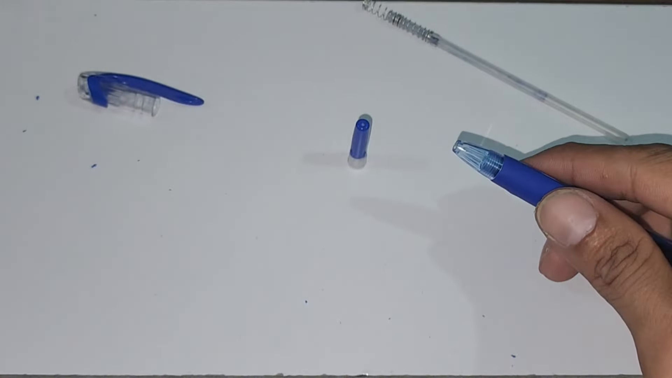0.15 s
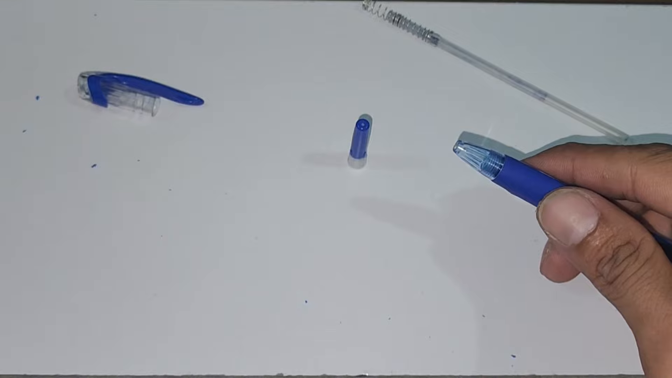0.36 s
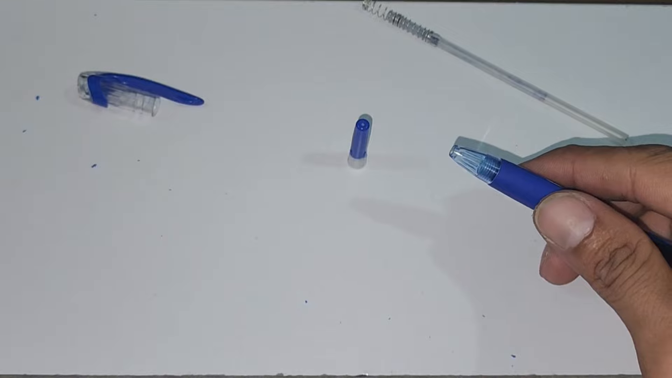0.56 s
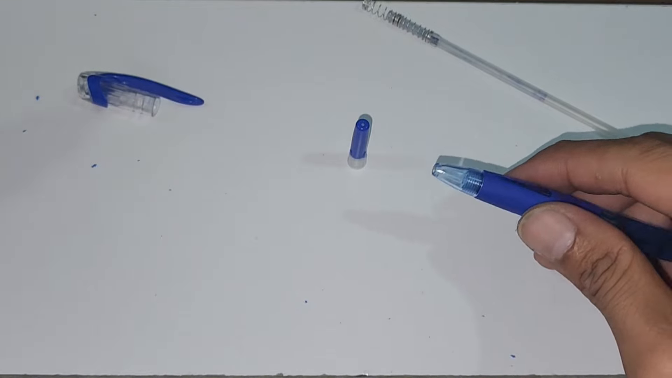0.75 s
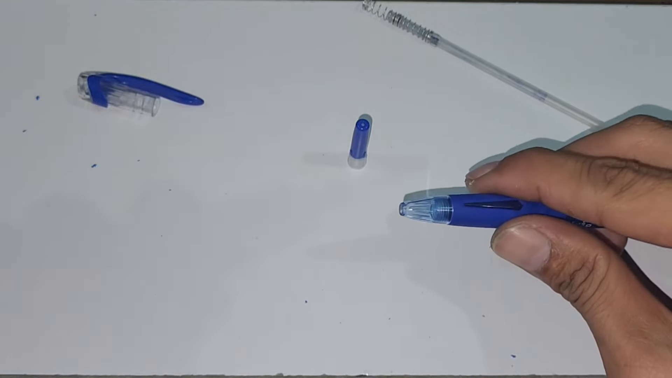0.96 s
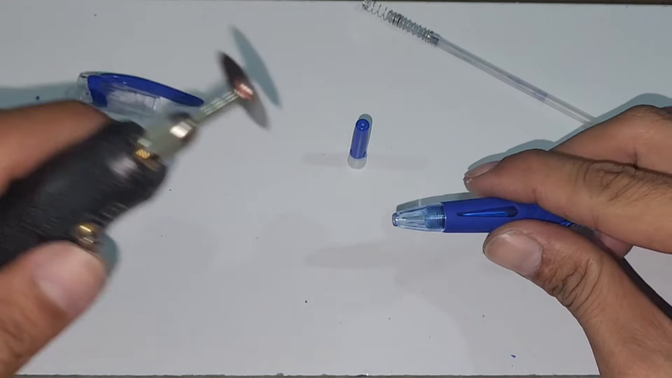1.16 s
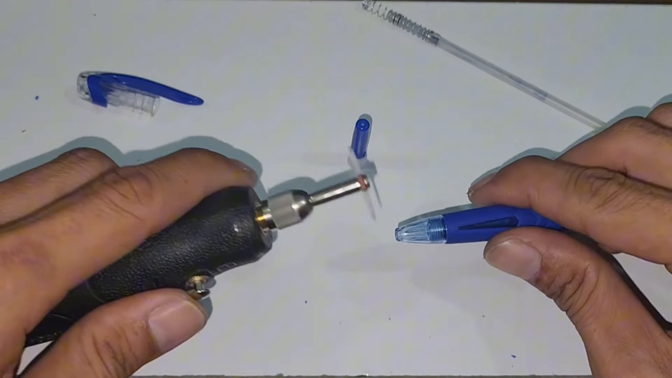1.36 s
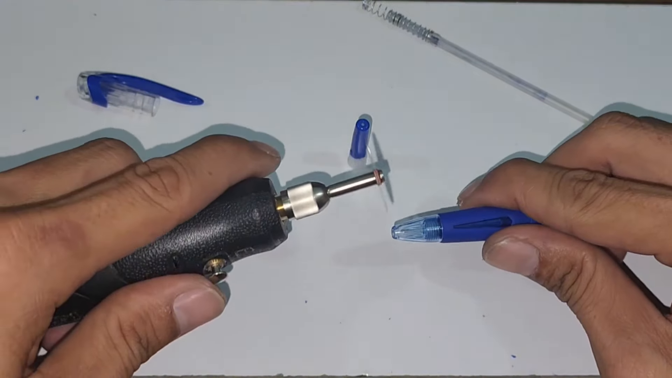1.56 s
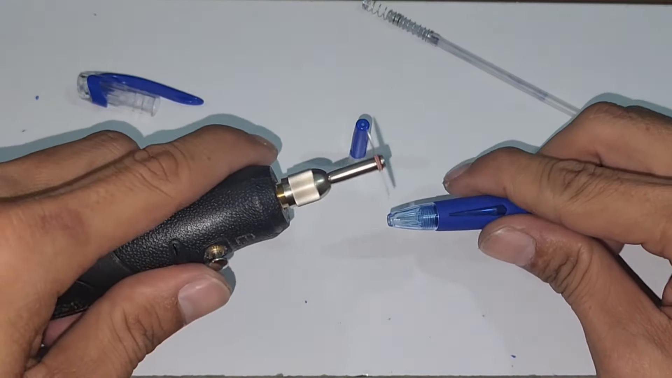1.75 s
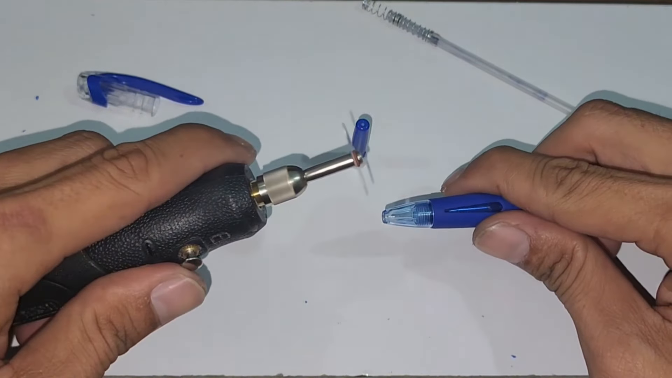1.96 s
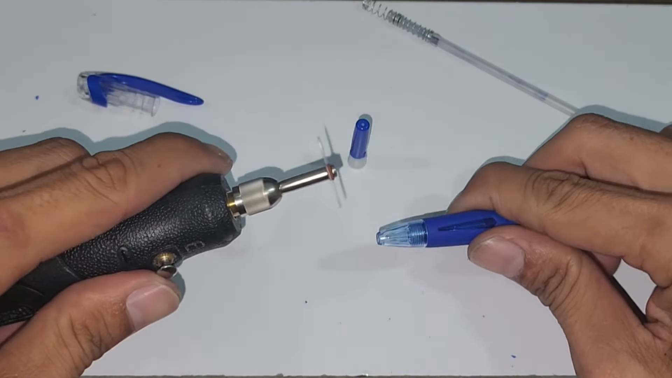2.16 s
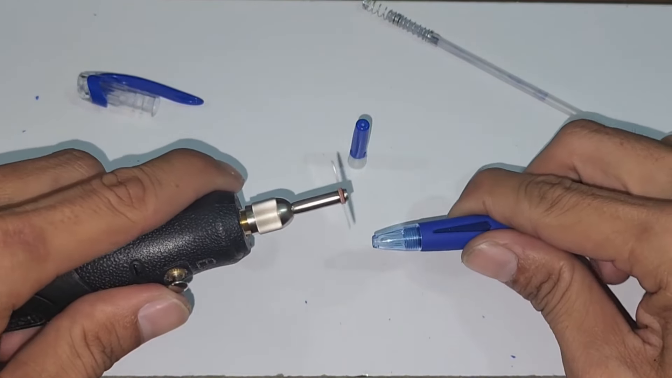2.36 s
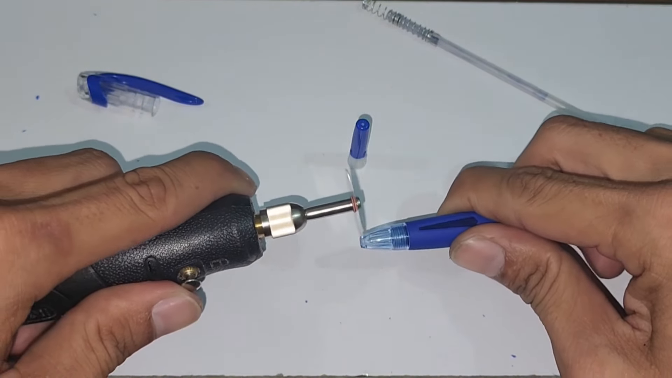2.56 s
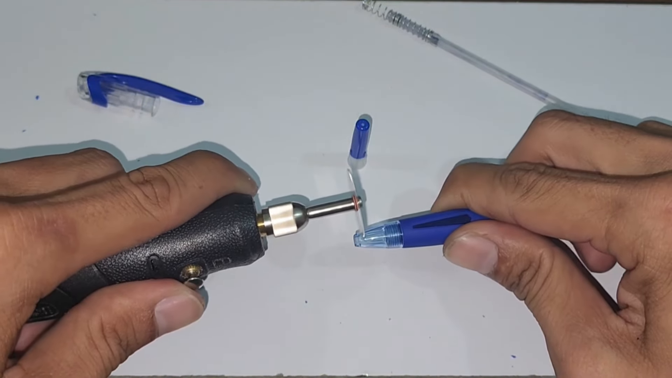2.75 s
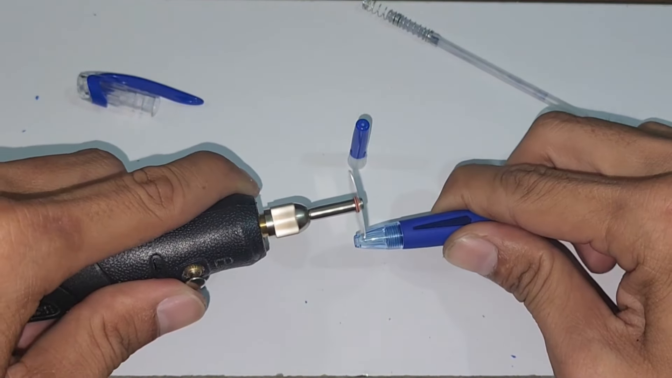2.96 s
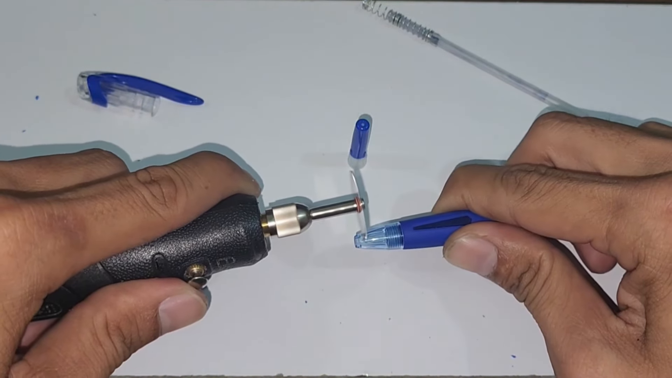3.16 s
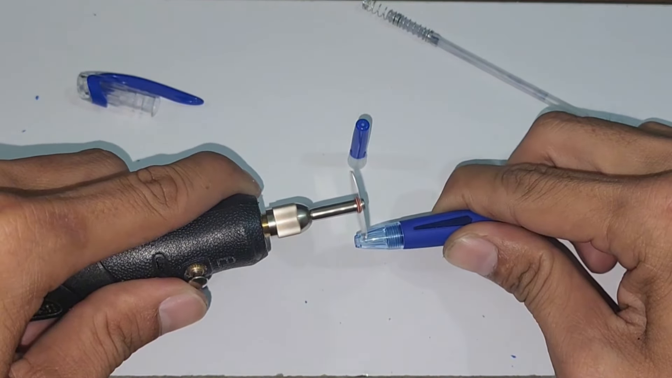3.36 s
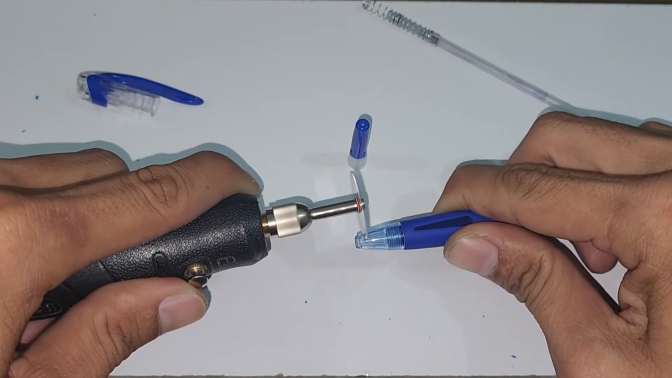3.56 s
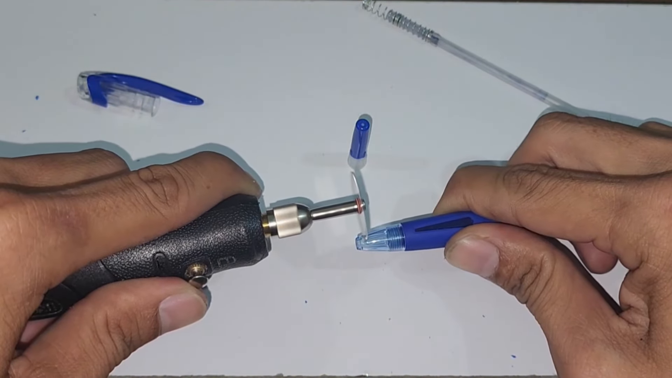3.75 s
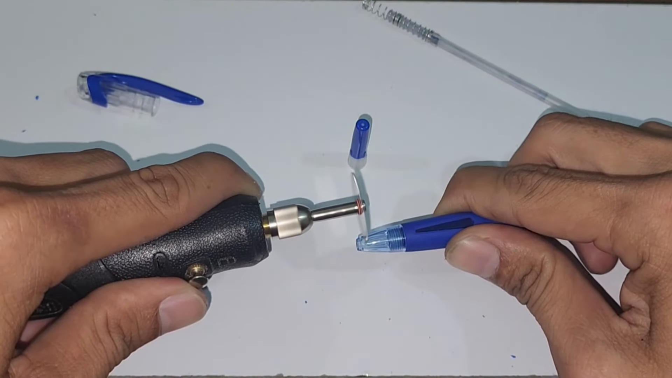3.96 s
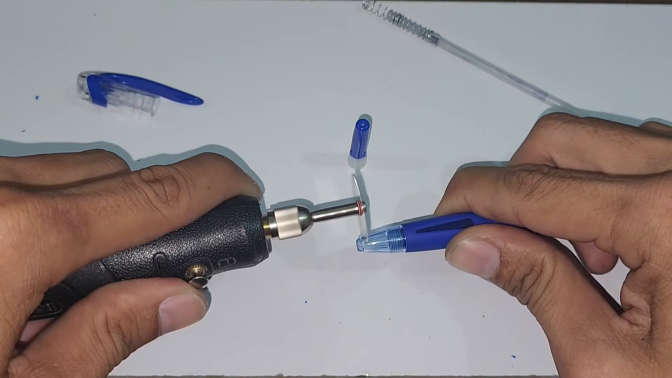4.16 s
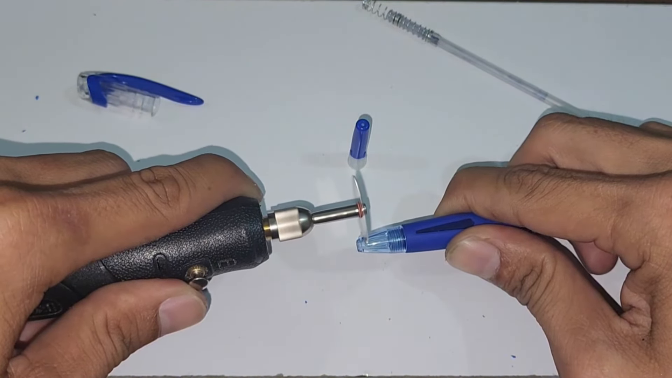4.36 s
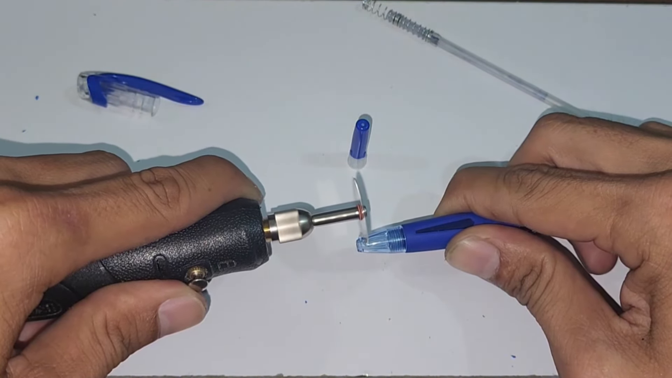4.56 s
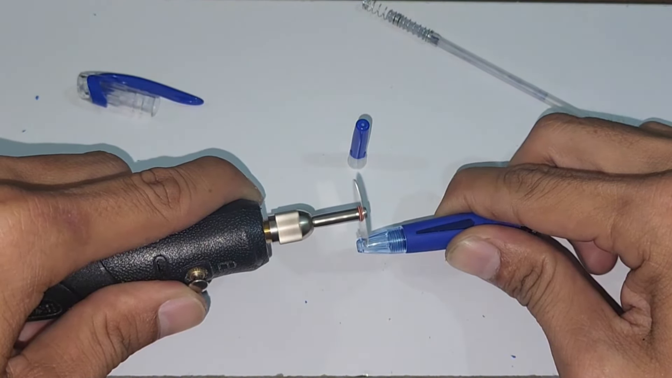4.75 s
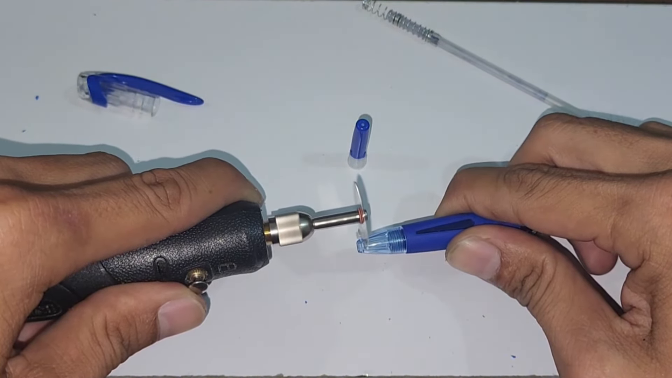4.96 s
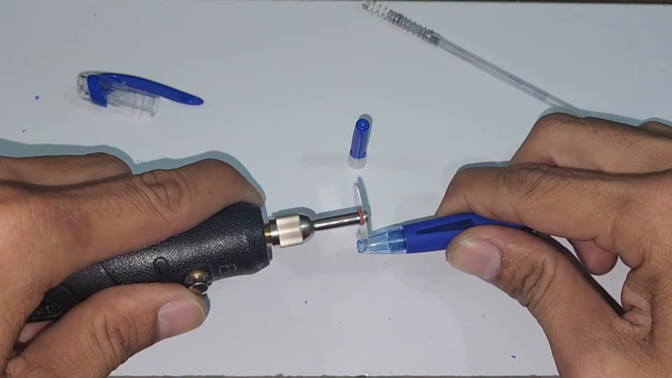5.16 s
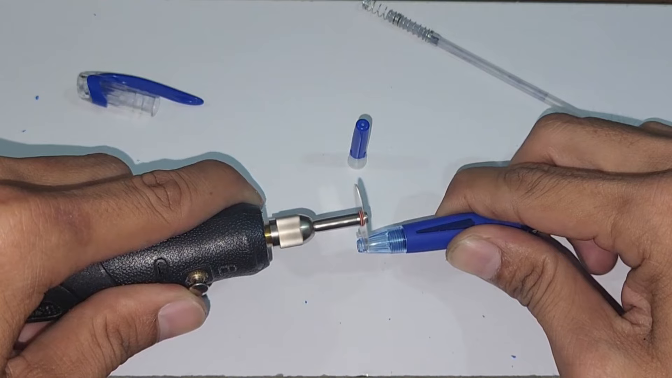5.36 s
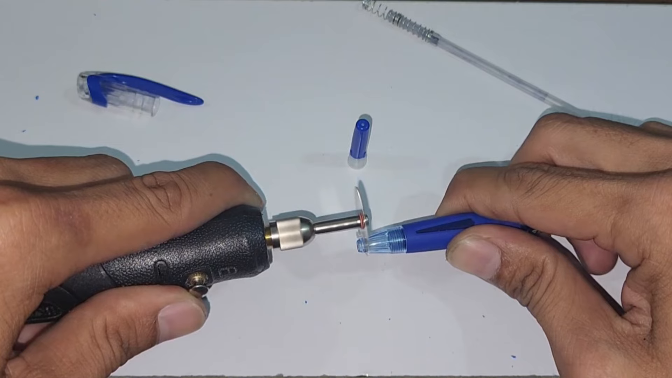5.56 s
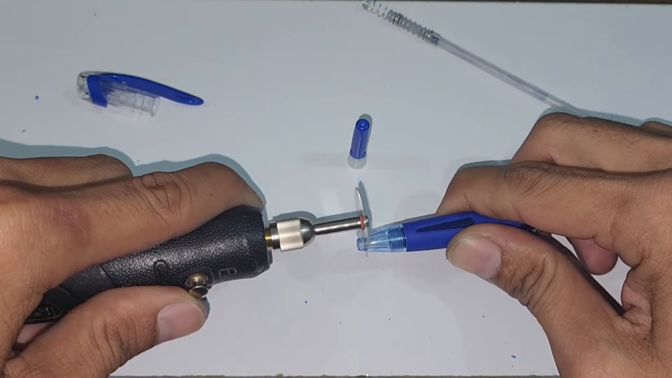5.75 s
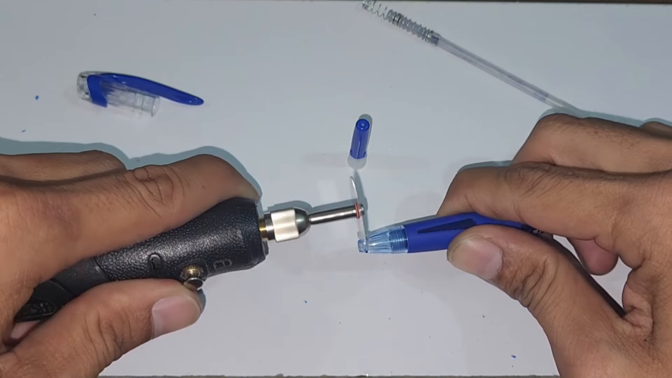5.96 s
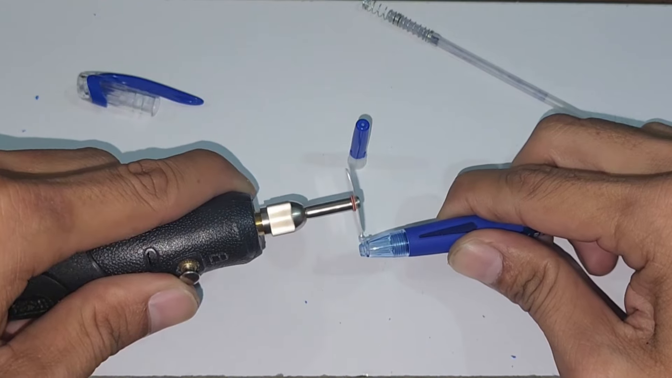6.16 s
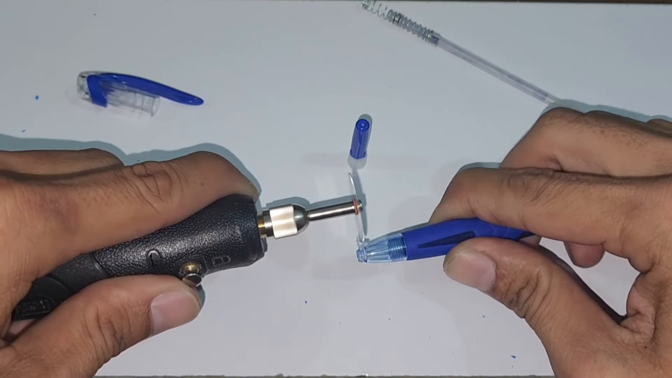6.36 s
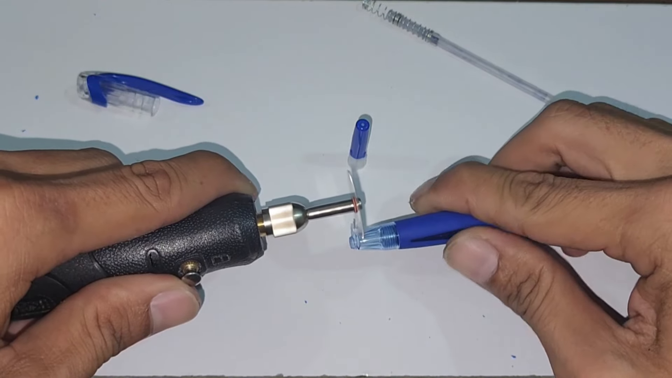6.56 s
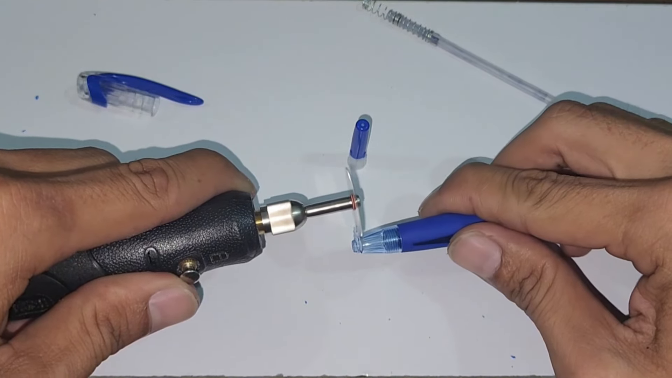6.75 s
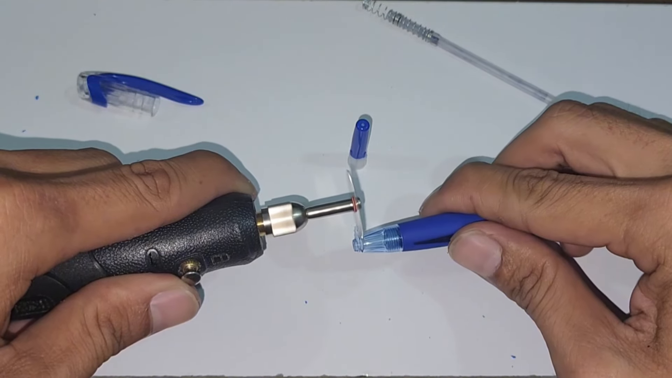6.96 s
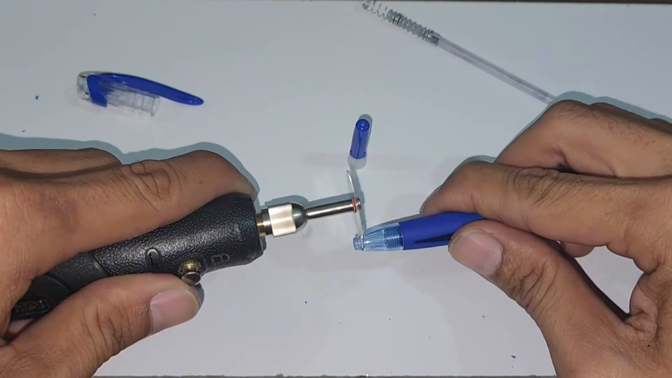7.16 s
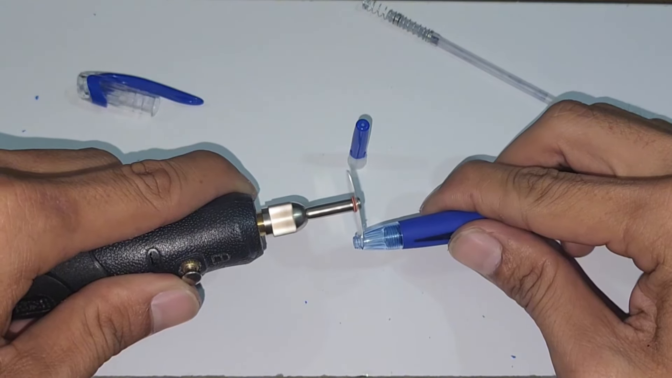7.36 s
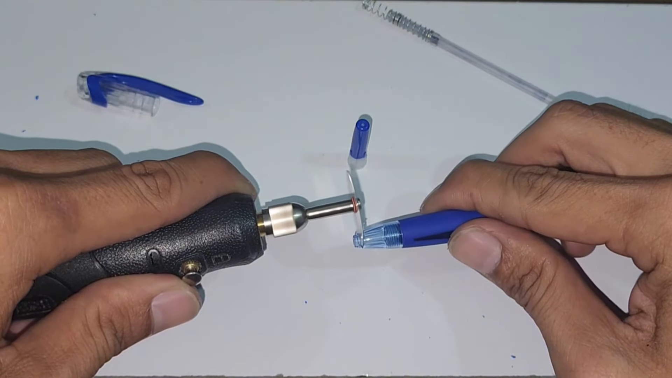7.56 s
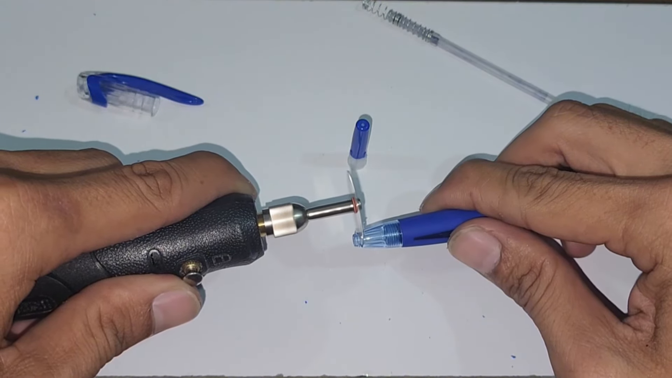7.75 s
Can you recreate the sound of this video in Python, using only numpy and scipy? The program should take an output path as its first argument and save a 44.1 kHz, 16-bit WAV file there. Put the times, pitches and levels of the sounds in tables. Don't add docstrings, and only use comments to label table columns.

```python
import sys
import numpy as np
from scipy import signal
from scipy.fft import rfft, irfft, next_fast_len
from scipy.io import wavfile
from scipy.ndimage import uniform_filter1d, map_coordinates

SR = 44100
rng = np.random.default_rng(int(sys.argv[2]) if len(sys.argv) > 2 else 0)


def log_audio(samples):
    frames = np.atleast_2d(samples).T
    limited = np.clip(frames, -1, 1)
    pcm = np.round(limited * 32767).astype(np.int16)
    wavfile.write(sys.argv[1], SR, pcm)


def gain_from_db(level_db):
    decades = np.asarray(level_db, float) / 20
    return 10 ** decades


N = 344421
T = np.arange(N) / SR
ARRIVE_S = 1.76
ORDERS = np.arange(1, 112)


def evened(x):
    return x / np.sqrt(np.mean(abs(x) ** 2) + 1e-20)


def along(rows, col, t, off=None):
    rows = np.array(rows)
    return np.interp(t, rows[:, 0], rows[:, col], off, off)


def read(points, hz):
    f, value = np.transpose(points)
    return np.interp(np.log(hz + 1), np.log(f + 1), value)


def coloured(x, points):
    size = next_fast_len(N)
    gain = gain_from_db(read(points, np.fft.rfftfreq(size, 1 / SR)))
    return irfft(rfft(x, size) * gain, size)[..., :N]


def resonance(x, hz, width):
    return signal.lfilter(*signal.iirpeak(hz, hz / width, SR), x)


def smooth(span):
    return evened(signal.oaconvolve(rng.standard_normal(N), np.hanning(int(span)), "same"))


def drift(shape, turns):
    z = rng.standard_normal(shape) + 1j * rng.standard_normal(shape)
    speed = np.fft.fftfreq(shape[0])[:, None]
    return evened(np.fft.ifft(z * np.exp(-(speed * turns) ** 2), axis=0))


# (frequency [Hz], level [dB per Hz])
ROOM = [(12, -33), (20, -11), (130, -5.5), (172, -20), (255, -12), (337, -17), (399, -28.5), (499, -24),
        (624, -29.5), (759, -28.5), (873, -31.5), (1570, -31.5), (1710, -30.5), (2080, -42), (16000, -62)]
# (frequency [Hz], width [Hz], level [dB])
HUM = [(88.7, 6.3, -62.5), (129.1, 7.3, -61.5), (164.3, 34, -68.5), (198.7, 15.5, -65)]
# (frequency [Hz], shared part [0-1])
SAME = [(30, 0.88), (120, 1), (300, 0.16), (700, 0.44), (1500, 0.085), (16000, 0.21)]


def room():
    size = next_fast_len(N)
    same = read(SAME, np.fft.rfftfreq(size, 1 / SR))
    shared = rfft(rng.standard_normal(size))
    private = rfft(rng.standard_normal(size))
    z = np.array([shared, same * shared + np.sqrt(1 - same ** 2) * private])
    white = evened(irfft(z, size)[:, :N])
    hum = sum(gain_from_db(db) * evened(resonance(resonance(white, f, w), f, w)) for f, w, db in HUM)
    return gain_from_db(-56.5) * evened(coloured(white, ROOM)) + hum


# (time [s], peak level [dB], ring [Hz])
TICKS = [
    (0.053, -65.5, 4720),
    (0.38, -59, 4120),
    (0.466, -40, 6430),
]
# (time [s], level [dB])
START = [(.43, -84), (.45, -39.5), (.47, -41), (.49, -46), (.56, -42), (.62, -42), (.72, -50)]


def switch():
    out, t = np.zeros((2, N)), np.arange(2600) / SR
    decay = gain_from_db(-60 * t / 0.012) + 0.33 * gain_from_db(-60 * t / 0.064)
    for s, db, hz in TICKS:
        burst = rng.standard_normal((2, len(t))) * decay
        click = 0.19 * np.diff(burst, prepend=0)
        ring = 5.1 * resonance(burst, hz, 1630)
        at = int(s * SR)
        out[:, at:at + len(t)] += gain_from_db(db + 2.0) * (click + ring)
    spectrum = [(900, -17), (2500, 5), (9000, -3), (14000, 7), (16000, 4.0)]
    hiss = evened(coloured(rng.standard_normal((2, N)), spectrum))
    return out + hiss * uniform_filter1d(gain_from_db(along(START, 1, T, -99)), 300)


# (time [s], speed [turns per s])
SPEED = [(0.6, 302), (3.75, 305), (3.989, 298.5), (4.262, 277), (4.509, 257), (4.709, 270.5), (4.82, 267),
         (5.101, 270), (5.551, 252), (5.698, 224.3), (6.099, 301.5), (6.54, 306.3), (6.583, 296),
         (6.669, 289), (6.788, 306), (7.3, 305), (7.691, 281.5), (7.81, 277)]
# (time [s], speed [turns per s])
STALL = [
    (5.779, 195),
    (5.831, 160),
    (5.869, 128),
    (5.922, 117),
    (5.951, 128),
    (5.98, 180),
    (5.998, 190),
    (6.029, 255),
    (6.06, 284),
]


def shaft():
    outside = [r for r in SPEED if not STALL[0][0] <= r[0] <= STALL[-1][0]]
    speed = uniform_filter1d(along(sorted(outside + STALL), 1, T), 700)
    kick_s, spin_up_s = .316, .163
    speed = speed * (1 - np.exp(-((np.maximum(T, .45) - kick_s) / spin_up_s) ** 2))
    tremble = smooth(1170) * (0.21 + 0.0263 * (306 - speed).clip(0, 60))
    turns = np.cumsum(speed + tremble) / SR
    whole = np.arange(int(turns[-1]) + 2)
    times = np.interp(whole, np.append(turns, turns[-1] + speed[-1]), np.append(T, T[-1] + 1))
    return turns, times


def played(orders, turns, times):
    steps = 1024
    hz = np.arange(1, orders.shape[1] + 1) / np.gradient(times)[:, None]
    audible = np.pad(orders * (hz < 17500), ((0, 0), (1, 0)))
    shapes = irfft(audible, steps, axis=1) * steps / np.sqrt(2)
    shapes = np.hstack([shapes, shapes[:, :1]])
    return map_coordinates(shapes, [turns, turns % 1 * steps], order=1, mode="nearest")


def whine_level(speed, times):
    on_s = .45
    wake = np.where(times > on_s, -20.5 * np.exp(-(times - on_s).clip(0) / 0.15), -70)
    change = np.gradient(uniform_filter1d(speed, size=15), times)
    brake = -4 * np.tanh((-change).clip(0) / 80)
    surge = -11 * np.tanh(change.clip(0) / 320)
    crawl = (215 - speed).clip(0) * (times > ARRIVE_S)
    far = 2 * (1 - times / ARRIVE_S).clip(0)
    return wake + far + brake + surge + .06 * crawl, wake, crawl


# (time [s], level of the once-a-turn tone [dB])
HOLD = [(0.65, -51), (1.15, -54), (1.22, -62), (1.64, -52), (1.86, -41), (2.1, -48), (2.23, -42),
        (3.81, -41.5), (4.49, -53), (5.0, -53), (5.28, -62), (5.44, -47), (5.7, -53), (6.01, -59.5),
        (6.29, -58), (6.33, -45), (7.32, -41.5), (7.81, -52)]


def firmness(times):
    hold = along(HOLD, 1, times)
    return hold, hold + 40


# (multiple of the shaft [1], level [dB])
IDLE = [(1, 0), (2, -20), (3, -16), (4, -15), (5, -2), (6, -12), (7, -9), (8, -22), (9, -20), (10, -11),
        (11, -17), (12, -8), (13, -13), (14, -16), (15, -3), (16, -12), (17, -13), (18, -9)]
# (frequency [Hz], level [dB])
UPPER = [(5800, -22.5), (6700, -15), (7600, -20.5), (9600, -26.5), (10000, -14.5), (10900, -10.5),
         (11300, -20), (16000, -20)]
# (frequency [Hz], level [dB])
LOADED = [(280, -1), (480, -28), (660, -16.5), (897, -23), (1300, -8.5), (2420, -6.5), (2670, -14),
          (4760, -4), (5790, -18.5), (6540, -6.5), (9000, -10.5), (11700, -60), (19800, -120)]


def housing_buzz(speed, times, load):
    upper = read(UPPER, 304 * ORDERS[len(IDLE):])
    free = np.append(np.transpose(IDLE)[1], upper) + 0.11 * firmness(times)[1][:, None]
    loaded = read(LOADED, ORDERS * speed[:, None]) + .5
    level = whine_level(speed, times)[0][:, None]
    return gain_from_db((1 - load) * free + load * loaded - 41.5 + level)


ORDERS_HELD = (2, 4, 5, 7, 8, 12, 15)
# (running free [dB], under load [dB], share of the hold followed [1],
# gain while the tool is turned away [dB])
TONES = [(-62, -56, 0.13, 2), (-56, -57.5, .4, -1), (-44.5, -51, 0.37, -1), (-54, -45.5, 0.54, 12),
         (-64, -54.5, 0.077, 13), (-53, -51, 0.054, 5), (-44, -46, 0.017, 1.5)]


def held_tones(strength, speed, times, load, bitten, lurch):
    hold, firm = firmness(times)
    _, wake, crawl = whine_level(speed, times)
    load, bitten, lurch = load[:, 0], bitten[:, 0], lurch[:, 0]
    boom = sum(np.exp(-((speed - hz) / 20) ** 2) for hz in (130, 199)) * (times > ARRIVE_S)
    damping = 1 - 0.18 * bitten * (1 - load)
    strength[:, 0] = damping * gain_from_db(hold + wake + 12.5 * boom)
    away = np.clip((ARRIVE_S + 0.35 - times) / .5, 0, 1)
    for k, (free_db, load_db, share, away_db) in zip(ORDERS_HELD, TONES):
        free = free_db + share * firm + away_db * away
        db = (1 - load) * free + load * load_db + wake
        if min(ORDERS_HELD) < k < max(ORDERS_HELD):
            db = db - 9.4 * np.tanh(lurch)
        strength[:, k - 1] = gain_from_db(db - .3 * crawl * np.clip((k - 3) / 2, -.15, 1))


def swelling(times, steady, strain, shaky):
    shape = (len(times), len(ORDERS))
    start = np.exp(2j * np.pi * rng.random(len(ORDERS)))
    jump_share = 0.68
    slow = drift(shape, turns=85)
    jumps = drift(shape, turns=.01)[np.searchsorted(np.transpose(HOLD)[0], times)]
    slow = np.sqrt(1 - jump_share ** 2) * slow + jump_share * uniform_filter1d(jumps, size=7, axis=0)
    tone = 1 + np.where(ORDERS > 1, .35, .15) * slow
    swell = start * np.where(steady, tone, 0.56 + 0.96 * slow)
    broken = np.clip(0.35 + 0.48 * strain, 0, .95) * np.clip(ORDERS / 5, 0, 1)
    swell = np.sqrt(1 - broken ** 2) * swell + broken * drift(shape, turns=11)
    return np.sqrt(1 - shaky ** 2) * swell + shaky * drift(shape, turns=0.14)


# (frequency [Hz], width [Hz], gain [dB])
TUBE = [(1269, 64, 5.5), (2064, 51, 8.5), (4770, 67, 2)]
# (frequency [Hz], level [dB])
SIDE_DB = [(60, -13), (150, -2), (380, -16), (950, 0), (2380, 0.5), (5980, -0.5), (15000, 0.5)]


def motor(turns, times):
    speed = uniform_filter1d(1 / np.gradient(times), 5)
    load = np.clip((301 - speed) / 25, 0, 1)[:, None]
    bitten = np.clip(np.interp(times, T, contact()) / gain_from_db(-57.0), 0, 1)[:, None]
    strain = np.maximum(load, bitten)
    lurch = (np.gradient(speed, times)[:, None] / 900) ** 2
    settling = .045 + .04 * np.exp(-(times[:, None] - .6).clip(0) / .7)
    patches = drift((len(times), len(ORDERS)), turns=52).real
    patchy = abs(evened(uniform_filter1d(patches, 3, 1))) + 2.25
    rough = patchy * settling + lurch + ((245 - speed[:, None]) / 50).clip(0)
    shaky = np.clip(rough * (ORDERS / 15) ** .5, 0, .95)
    strength = housing_buzz(speed, times, load)
    held_tones(strength, speed, times, load, bitten, lurch)
    for hz, width, db in TUBE:
        near = np.exp(-((ORDERS * speed[:, None] - hz) / width) ** 2)
        strength = strength * gain_from_db(db * strain * near)
    steady = np.isin(ORDERS, (1, *ORDERS_HELD))
    middle = strength * swelling(times, steady, strain, shaky)
    side = strength * gain_from_db(read(SIDE_DB, ORDERS * 300)) * swelling(times, 0 * steady, strain, shaky)
    middle, side = played(middle, turns, times), played(side, turns, times)
    return np.array([middle + side, middle - side])


# (time [s], length [s], level [dB])
GRIP = [
    (1.934, 0.078, -60),
    (2.243, 0.12, -58),
    (5.101, 0.48, -58),
]


def grip():
    shape = sum(gain_from_db(db) * np.sin(np.pi * np.clip((T - s) / length, 0, 1)) for s, length, db in GRIP)
    return shape * evened(resonance(resonance(rng.standard_normal((2, N)), 750, 650), 750, 650))


# (time [s], level [dB])
PRESS = [
    [(3.72, -44), (3.81, -47), (4.01, -46), (4.27, -39.5), (4.41, -36), (4.68, -34), (5.37, -34.5),
     (5.59, -35.5), (5.89, -46), (5.97, -51.5)],
    [(6.86, -55), (7.004, -58), (7.262, -47.5), (7.45, -37.5), (7.664, -42), (7.81, -37.5)],
]
# (time [s], peak level [dB], time to full bite [s])
BITES = [(3.2303, -27, 0.01), (3.285, -24.5, .014), (3.3774, -30, .016), (3.4443, -29, 0.017),
         (3.518, -23, 0.012), (3.7695, -26.5, .014), (3.841, -19.5, .014), (3.9147, -24.5, 0.013),
         (4.002, -23, 0.009), (4.3622, -26.5, .014), (4.4749, -21.5, .019), (4.5278, -22.5, 0.01),
         (4.59, -19, 0.0091), (4.6969, -18, 0.034), (4.7872, -21, 0.018), (4.9384, -25, 0.014),
         (5.1953, -24, .017), (5.3484, -18.5, 0.01), (5.4966, -26, 0.011), (5.551, -26, .015),
         (5.97, -23.5, 0.021), (6.5558, -22.5, 0.029), (6.6285, -20, 0.0085), (6.9433, -34, .014),
         (7.0395, -29.5, 0.011), (7.291, -25.5, 0.0082), (7.346, -20.5, 0.0065), (7.5095, -22, 0.014),
         (7.5719, -24.5, .013), (7.655, -22, 0.0094)]


def contact():
    power = uniform_filter1d(sum(gain_from_db(along(rows, 1, T, -99)) ** 2 for rows in PRESS), 900)
    for s, db, swell in BITES:
        near = slice(int((s - .003) * SR), int((s + .2) * SR))
        u = (T[near] - T[near][0]) / swell
        power[near] += gain_from_db(db - 13) ** 2 * u ** 0.68 * np.exp(.4 - u ** 2 / 2.55)
    return np.sqrt(power)


# (frequency [Hz], level [dB per Hz])
SCRAPE = [(900, -38), (1500, -17), (5000, -14), (7000, -9.5), (9500, -11), (11000, -5), (13000, -1),
          (14500, -4), (15700, -7), (16300, -30)]
# (frequency [Hz], width [Hz], level [dB])
DISC = [(11374, 7, 6.5), (12360, 10, 8.5), (13050, 12, 2), (13100, 49, -30), (15500, 52, -4)]
# (time [s], level [dB])
TOOTH = [(3.2, -10), (4.5, -10), (5.55, -5.5), (5.8, -1.5), (5.9, 3), (5.97, 12.5), (6.02, 6), (6.06, -12),
         (7.81, -8)]


def cutting(turns, times):
    spot = turns + 0.22 * smooth(7200)
    wobble = .5 + np.exp(2.5 * (np.cos(2 * np.pi * spot) - 1))
    chatter = gain_from_db(2.1 * smooth(1000))
    force = contact() * evened(wobble * chatter)
    order = np.arange(1, 141)
    shape = (len(times), len(order))
    whistle = np.exp(-.5 * ((order - 60) / 4) ** 2)
    loose = np.clip(.04 + (order / 100) ** 2, 0, .9)
    out = []
    for _ in range(2):
        rim = np.sqrt(1 - loose ** 2) * drift(shape, turns=3.8) + loose * drift(shape, turns=0.57)
        scrape = evened(coloured(played(rim, turns, times), SCRAPE))
        teeth = gain_from_db(along(TOOTH, 1, T)) * evened(played(rim * whistle, turns, times))
        teeth = coloured(teeth, [(6000, -8), (9000, -1.5), (12000, -4.5), (15800, -8), (16500, -72)])
        drive = force * (scrape + teeth)
        ring = sum(gain_from_db(db + 4) * resonance(drive, hz, width + 110) for hz, width, db in DISC)
        out.append(1.216 * drive + ring)
    return gain_from_db(4.0) * np.array(out)


def walls(x):
    t = np.arange(9000) / SR
    tail = rng.standard_normal((2, len(t))) * gain_from_db(-60 * t / 0.28) * (t > .003)
    return signal.oaconvolve(x, tail / np.linalg.norm(tail[0]), axes=1)[:, :N]


# (time [s], left minus right [dB])
LEAN = [(0.45, 2), (1.37, 3.5), (1.72, 1), (2.13, 3.5), (3.65, 0), (4.41, 0.5), (5.29, -1), (7.22, 3),
        (7.81, 0.0)]


def scene():
    turns, times = shaft()
    lean_db = along(LEAN, 1, T) / 2
    whine = motor(turns, times)
    rest = cutting(turns, times) + switch() + grip()
    echo = gain_from_db(-17) * walls(np.diff(whine, prepend=0)) + gain_from_db(-8) * walls(rest)
    return (whine + rest + echo) * gain_from_db(np.array([lean_db, -lean_db])) + room()


def gate(x):
    hz, _, z = signal.stft(x, SR, nperseg=2048, noverlap=1536)
    power = uniform_filter1d((abs(z) ** 2).mean(0), size=3, axis=1) + 1e-20
    nearby = abs(uniform_filter1d(power, size=15, axis=0))
    keep = power / (power + gain_from_db(-17.5) ** 2 * nearby)
    depth = 0.27 * (hz > 400)[:, None]
    return signal.istft(z * keep ** depth, SR, nperseg=2048, noverlap=1536)[1][:, :N]


def band_limit(x):
    return signal.sosfilt(signal.butter(12, 17030, fs=SR, output="sos"), x)


def record(dry):
    edge = signal.firwin(401, 15950, window=("kaiser", 9), fs=SR)
    mix = signal.oaconvolve(gate(dry), edge[None], "same")
    return band_limit(mix)


dry = scene()
out = record(dry)
log_audio(out)
```